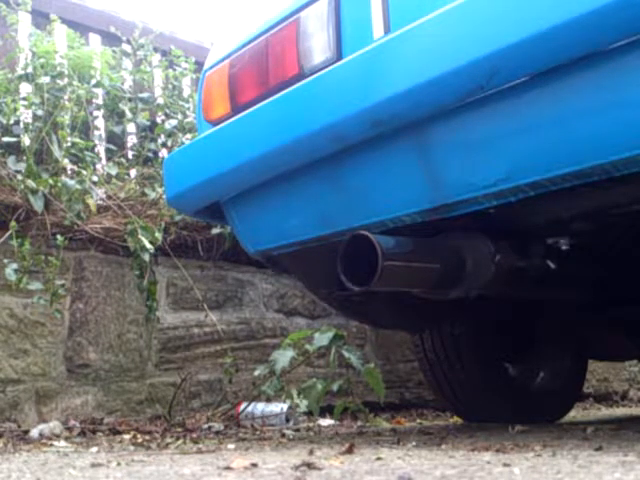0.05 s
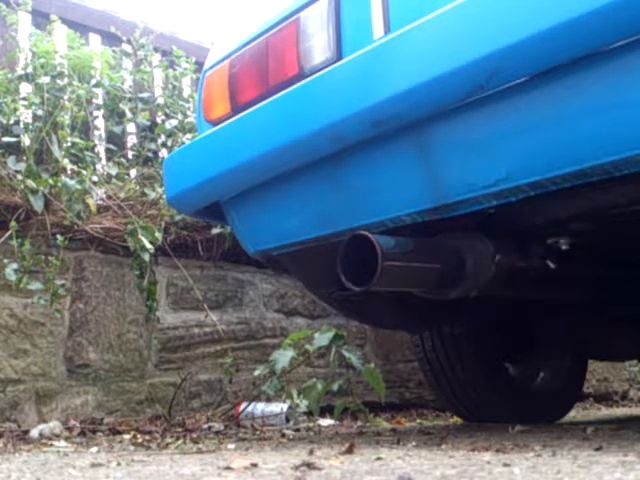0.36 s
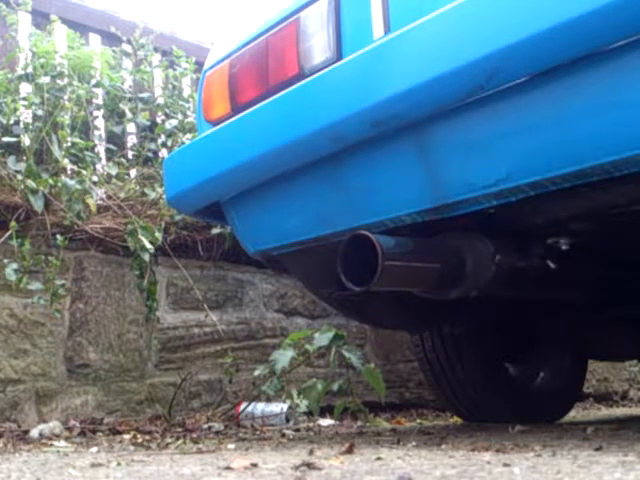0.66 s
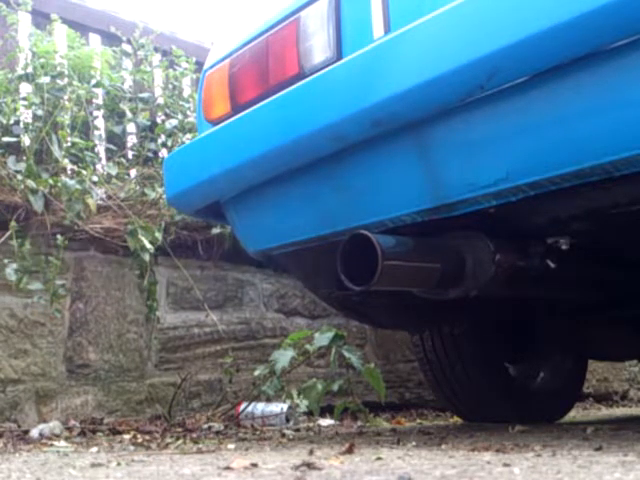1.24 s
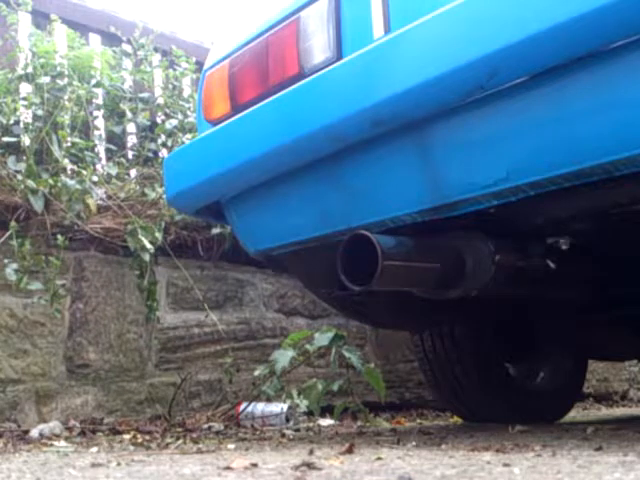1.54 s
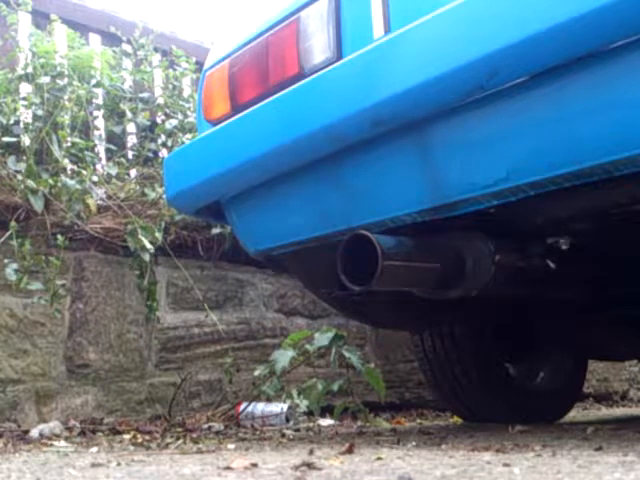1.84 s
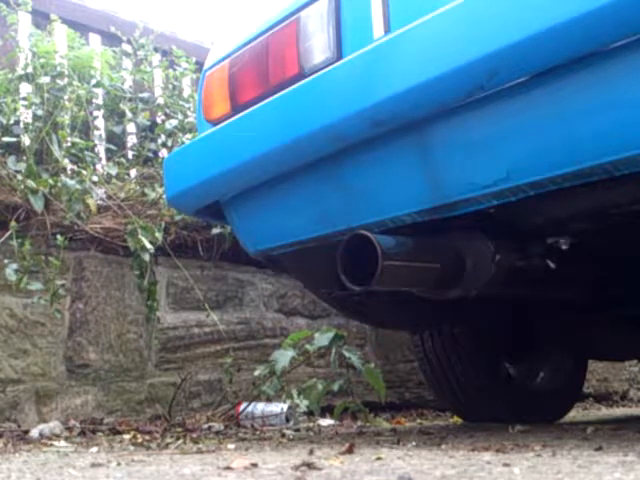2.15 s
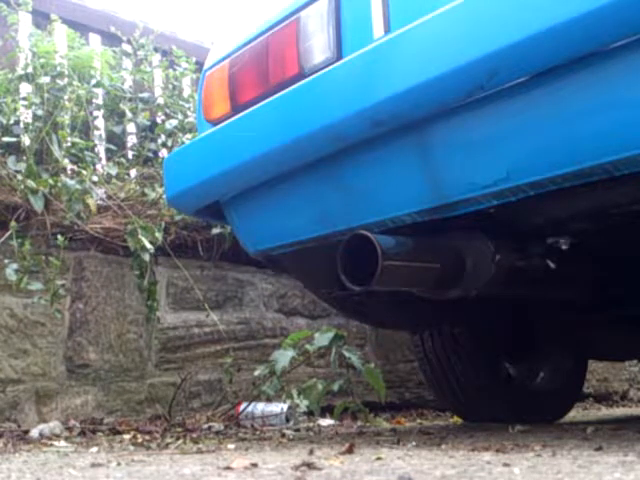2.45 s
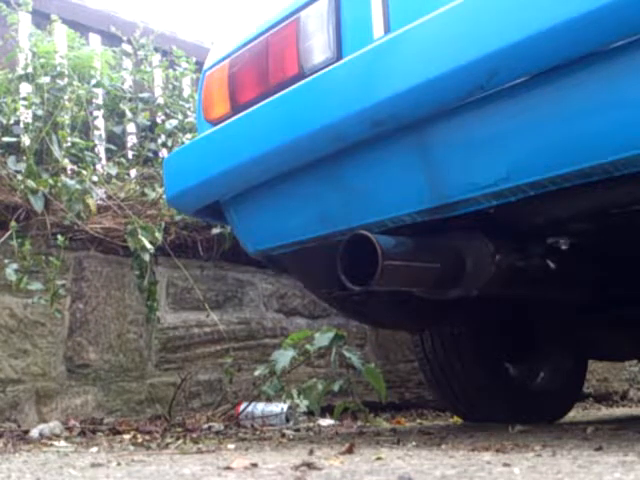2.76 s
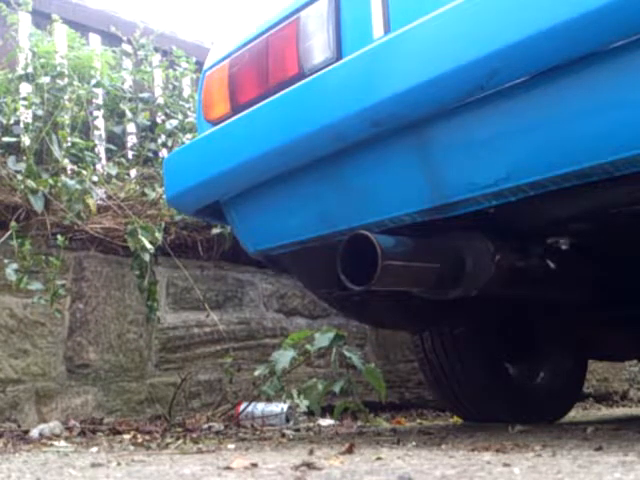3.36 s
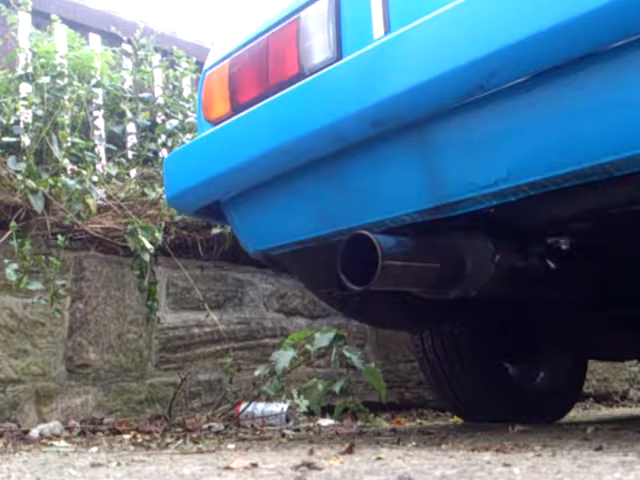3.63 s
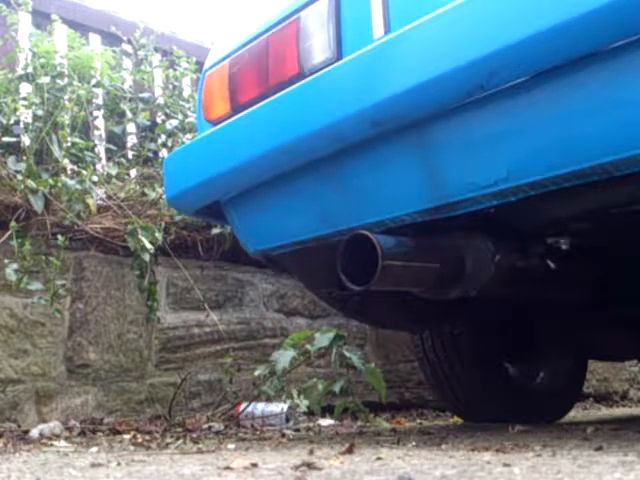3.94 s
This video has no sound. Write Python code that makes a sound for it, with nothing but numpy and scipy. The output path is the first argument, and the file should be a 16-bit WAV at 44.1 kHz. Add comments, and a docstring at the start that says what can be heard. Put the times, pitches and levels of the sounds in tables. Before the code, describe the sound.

A car starting up: the starter grinds, then the engine sputters to life and idles.

```python
"""A four-cylinder car engine starts from cold beside a stone wall, heard close to the tailpipe.
The starter clacks in and grinds through four compressions; the engine coughs, stumbles, catches and
settles into a fast, slightly uneven idle. Each firing sends a boom, a rasp and a crack down the pipe,
with belts and valves faint behind. The first firings drive a fast limiter."""
import sys
import numpy as np
from scipy import signal
from scipy.fft import rfft, irfft
from scipy.io import wavfile
from scipy.ndimage import uniform_filter1d, minimum_filter1d

SR = 44100
rng = np.random.default_rng(int(sys.argv[2]) if len(sys.argv) > 2 else 0)


def file_out(sig):
    """Save sig as 16-bit WAV at sys.argv[1]."""
    # one column per channel
    cols = np.atleast_2d(sig).T
    # limit, then scale
    lim = np.clip(cols, -1, 1)
    pcm = np.round(lim * 32767).astype(np.int16)
    wavfile.write(sys.argv[1], SR, pcm)


N = 176400
T = np.arange(N) / SR

# Engine speed once it catches. Each row: time in seconds, firings per second.
FIRING_RATE = [(1.186, 51), (1.25, 56), (1.34, 60), (1.45, 61.3), (1.6, 60), (1.8, 58.55), (2.2, 58.38),
               (2.68, 58.25), (3, 57.13), (3.4, 56.52), (3.75, 55.52), (4, 54.6)]
# The first, stumbling firings. Each row: start in seconds, then boom, rasp, crack and silencer ring in dB.
COLD_COUGHS = [(0.857, -1, 3, 12, -0.5), (0.878, -9, -7, -8, -4), (.898, 6, 13.5, 26.5, 2.5),
               (0.9277, 4.5, 8.5, 24, 2), (0.953, -15, 18.5, 11, -2.5), (0.9658, 10.5, 16.5, 24.5, -31),
               (0.974, -11, -2, 1, -17), (.995, -9, -1, -11, -4.5), (1.016, -21, 2, -9, -9),
               (1.0529, 13, 11, 29, 0), (1.1037, 8.5, 12, 20.5, -16), (1.124, 7, 6, 19, -14),
               (1.145, 0, 14.5, 18, 0), (1.1652, 14, 15, 9, 1.5)]
# Ringing engine and starter parts. Each row: pitch in Hz, level in dB, seconds to fade by 60 dB.
METAL_MODES = [(797, -12, .12), (1346, -6, .1), (1662, -10, .1), (1828, -10, .1), (2380, -1, .11),
               (2551, -9, .08), (3048, -7, .11), (3257, -8, .1), (3738, -8, .06)]
FIRST_COUGH_S, CATCH_S, SETTLED_S = COLD_COUGHS[0][0], FIRING_RATE[0][0], FIRING_RATE[4][0]


def firings():
    """The cylinders cough, then run. Each row: start in seconds, cylinder, boom, rasp and crack in dB."""
    # Force of the running engine. Each row: time in seconds, then boom, rasp and crack in dB.
    force = [(1.186, 1.5, 15, 20), (1.26, -1, 8.5, 13), (1.33, -4, 7.5, 10.5), (1.6, -2.5, 3, 1),
             (2.5, -1.5, 1, 2), (3.3, -1.5, 2, -3), (4, -1, 4, -32)]
    # The cylinders' uneven voices, in firing order. Each row: boom and rasp offsets in dB.
    cylinders = [(-2.5, -1), (.6, 0), (2, 1), (-.3, 0)]
    rows = [(s, k % 4, boom, rasp, crack) for k, (s, boom, rasp, crack, _) in enumerate(COLD_COUGHS)]
    cycles = np.cumsum(curve(FIRING_RATE) * (T >= CATCH_S)) / SR
    onsets = np.searchsorted(cycles, np.arange(int(cycles[-1]) + 1), "right")
    for k, s in enumerate(T[onsets.clip(0, N - 1)]):
        boom, rasp, crack = (curve(force, s, column) for column in (1, 2, 3))
        boom_offset, rasp_offset = cylinders[k % 4]
        rows.append((s, k % 4, boom + boom_offset, rasp + rasp_offset, crack))
    return rows


def exhaust():
    """Each firing leaves the pipe as a boom, a rasp of gas and a crack; coughs also ring the silencer."""
    # Deep body of one exhaust pulse. Each row: frequency in Hz, relative level in dB.
    boom_tone = [(20, -53), (38, -31), (56, -3), (85, -2), (117, 0.5), (150, 0.5), (178, -1), (232, -2.5),
                 (290, -6), (350, -32.5), (420, -30), (560, -36), (660, -23), (780, -31), (950, -52.5),
                 (2000, -64.5), (5000, -92)]
    # Gas rushing out behind the pulse. Each row: frequency in Hz, relative level in dB.
    rasp_tone = [(40, -38), (100, -3.5), (200, -7), (300, 4.5), (420, 3), (540, -2.5), (690, -0.5),
                 (800, -4), (950, -17.5), (1400, -25.5), (2500, -33), (6000, -63.5)]
    # Bright edge of a firing or spit. Each row: frequency in Hz, relative level in dB.
    crack_tone = [(200, -11), (700, -4), (1300, 2), (2200, -10), (4000, -23), (9000, -22), (15000, -35)]
    # The silencer's hollow ring. Each row: pitch in Hz, level in dB, seconds to fade by 60 dB.
    silencer_modes = [(82.1, 1.5, 0.22), (126.6, -10, 0.21), (178, -20, 0.1), (231.3, -15, 0.6),
                      (701, -34, 0.53)]
    # Pops of late-burning fuel in the pipe. Each row: start in seconds, level in dB.
    spits = [(0.955, 28), (1.167, 41), (1.174, 34), (1.187, 19), (1.207, 24), (1.226, 26.5), (1.266, 20),
             (1.451, 16.5), (1.97, 11.5), (2.108, 11), (2.136, 5), (2.174, 11.5), (2.52, 11.5), (3.78, 7.5),
             (3.925, 9)]
    rasp_rise_s, rasp_fall_s, crack_fall_s, spit_fall_s = 0.0059, 0.013, 0.0053, 0.0019
    jitter_s, crack_lag_s, boom_scatter_db, crack_scatter_db = 0.00006, 0.003, 1.5, 2
    repeat_share = 0.52  # part of the rasp's power that is the same each time a cylinder fires
    booms, rasps, cracks, knocks = np.zeros((4, N))
    t = T[:2048]
    rush = (1 - np.exp(-t / rasp_rise_s)) * np.exp(-t / rasp_fall_s)
    signatures = noise((4, len(t)))
    for s, cylinder, boom_db, rasp_db, crack_db in firings():
        late, force, sharp = noise(3)
        s = s + jitter_s * late
        add(booms, s, amp([boom_db + boom_scatter_db * force]))
        gas = np.sqrt(repeat_share) * signatures[cylinder] + np.sqrt(1 - repeat_share) * noise(len(t))
        add(rasps, s, amp(rasp_db) * rush * gas)
        crack_db += crack_scatter_db * sharp * (s > CATCH_S)
        add(cracks, s + crack_lag_s, amp(crack_db) * np.exp(-t / crack_fall_s) * noise(len(t)))
    for s, *_, ring_db in COLD_COUGHS:
        add(knocks, s, amp([ring_db - 1.5]))
    for s, db in spits:
        add(cracks, s, amp(db) * np.exp(-t / spit_fall_s) * noise(len(t)))
    pipe = response(boom_tone)
    add(pipe, 0.0053, amp(-1) * pipe)  # the pulse runs up the pipe and back once more
    boom = -amp(-1) * through(booms, pipe / abs(pipe).max())
    silencer = through(knocks, ring(silencer_modes))
    rasp = amp(-19.5) * through(rasps, response(rasp_tone))
    crack = amp(-40) * through(cracks, response(crack_tone))
    return boom + silencer + rasp + crack


def pipe_song():
    """As the engine settles, the pipe sings on a few overtones of the firing rate."""
    # Clear tones of the idle. Each row: multiple of the firing rate, level in dB.
    overtones = [(6, -32), (10, -37), (11, -29.5), (12, -33), (13, -37), (14, -43)]
    cycles = np.cumsum(curve(FIRING_RATE)) / SR
    fade_in = np.clip((T - CATCH_S) / (SETTLED_S - CATCH_S), 0, 1)
    return fade_in * sum(amp(db) * np.sin(2 * np.pi * (k * cycles + rng.random())) for k, db in overtones)


def starter():
    """The motor sizzles and whines; each compression drags its pitch down and makes the teeth grind."""
    # Compressions that load the starter. Each row: start in seconds, length in seconds, level in dB.
    strokes = [(0.106, 0.21, -7), (0.379, 0.11, -1.5), (0.58, 0.0564, 1), (0.74, 0.08, 0.5),
               (1.031, .025, -3)]
    # The motor spinning, then running down. Each row: time in seconds, level in dB.
    spin_levels = [(0, -44), (.03, -11), (.06, 0), (.11, -8), (.27, -2), (.31, 0), (.38, 2.5), (.46, -4),
                   (.55, 2), (.66, 0.5), (.74, 5), (.79, -5), (.85, 6.5), (.98, -1.5), (1.05, 3.5),
                   (1.13, 2), (1.2, -9.5), (1.35, -10.5), (1.6, -13), (2.1, -38.5), (4, -94)]
    # Gear teeth under load. Each row: frequency in Hz, relative level in dB.
    grind_tone = [(60, -6), (200, 3.5), (330, -4.5), (600, 2), (900, 1), (1400, -0.5), (2000, -5.5),
                  (3000, -8.5), (5000, -23), (10000, -35), (13000, -39)]
    # Sizzle of the spinning motor. Each row: frequency in Hz, relative level in dB.
    sizzle_tone = [(59, -43.5), (100, 9), (300, -17.5), (381, -1), (465, -21.5), (640, 2.5), (797, -11),
                   (1340, -7.5), (1540, -15.5), (2040, -3), (2210, -11.5), (3160, -4), (3490, -11.5),
                   (3780, -5.5), (5860, -13), (9100, -10.5), (11800, -18), (15300, -59), (22000, -120)]
    # The gear's whine. Each row: multiple of the tooth rate, level in dB.
    whine_partials = [(1, 0.5), (2, -14), (4, -9), (9, 0), (10, -14), (11, -16.5)]
    rise_s, fall_s, sag_db = 0.0073, 0.015, -6
    unloaded_tooth_hz, drag, waver_depth, waver_s = 363, 0.0591, 0.0081, 0.0038
    load = np.zeros(N)
    for s, length, db in strokes:
        age = np.maximum(T - s, 0)
        attack = 1 - np.exp(-age / rise_s)
        release = np.exp(-np.maximum(age - length, 0) / fall_s)
        load += amp(db + sag_db * np.minimum(age / length, 1)) * attack * release
    waver = waver_depth * unit(uniform_filter1d(noise(), int(waver_s * SR)))
    tooth_phase = 2 * np.pi * np.cumsum(unloaded_tooth_hz * (1 - drag * load + waver)) / SR
    teeth = 1 + 0.43 * np.cos(tooth_phase)  # the noise pulses as each tooth meshes
    spin = amp(curve(spin_levels))
    whine = spin * sum(amp(db) * np.cos(k * tooth_phase) for k, db in whine_partials)
    scrape = noise() * teeth * load
    metal = ring(METAL_MODES)
    gear_ring = through(scrape, metal / np.linalg.norm(metal))
    grind = through(scrape, response(grind_tone)) + amp(-10.5) * gear_ring
    sizzle = through(noise() * teeth * spin * (1 + 0.52 * load), response(sizzle_tone))
    return amp(-24) * grind + amp(-34) * sizzle + amp(-47) * whine


def pinion():
    """The starter gear rattles into mesh and rings the metal round it."""
    # The pinion slamming in. Each row: start in seconds, level in dB.
    clacks = [(.039, -10), (.0455, 1), (.052, -3), (.059, -5)]
    # Colour of a clack. Each row: frequency in Hz, relative level in dB.
    clack_tone = [(30, -44), (100, 2), (190, 8.5), (350, -11), (800, 2.5), (1300, -7), (2400, 0.5),
                  (4500, -8), (5600, -15), (9000, -12.5), (11000, -16.5), (12500, -33), (15000, -40)]
    # Ring of solenoid and pinion. Each row: pitch in Hz, level in dB, seconds to fade by 60 dB.
    solenoid_modes = [(199, -14, .12), (1997, -13, .1), (2379, -2, .1), (3779, -13, .12), (4813, -17, .12),
                      (6320, -22, .12), (8931, -19, .11)]
    bursts, knocks = np.zeros((2, N))
    t, fall_s = T[:SR // 4], 0.013
    for s, db in clacks:
        add(bursts, s, amp(db) * np.exp(-t / fall_s) * noise(len(t)))
        add(knocks, s, amp([db]))
    rattle = through(bursts, response(clack_tone))
    return amp(-16.5) * rattle + amp(-18) * through(knocks, ring(solenoid_modes))


def air_puffs():
    """Unburnt air puffs softly from the pipe while cranking; later, slow thumps of air hit the mic."""
    # Puffs from the pipe. Each row: start in seconds, level in dB.
    puffs = [(0.119, -5), (0.235, 2.5), (.44, 3), (0.494, -8), (.615, -2), (0.785, 6)]
    # Sub-bass thumps of air. Each row: start in seconds, level in dB.
    thumps = [(1.485, -13), (3.04, -25)]
    puff_hz, puff_t60_s, puff_rise_s = 75.5, 0.19, 0.02
    thump_hz, thump_t60_s = 32, 0.08
    air = np.zeros(N)
    puff = ring([(puff_hz, -16.5, puff_t60_s)])
    puff *= np.minimum(T[:len(puff)] / puff_rise_s, 1)
    for s, db in puffs:
        add(air, s, amp(db) * puff)
    for s, db in thumps:
        add(air, s, ring([(thump_hz, db, thump_t60_s)]))
    return air


def engine_bay():
    """Belts whirr and valves tick in step with the firing rate, fading in over the coughs."""
    # Belts and valve gear under the bonnet. Each row: frequency in Hz, relative level in dB.
    whirr_tone = [(530, -21.5), (900, -13), (1120, -16), (1330, -10), (1700, -17.5), (2000, -0.5),
                  (2130, -10), (2450, -5), (3420, -16), (3810, -10), (4720, -18.5), (5430, -18),
                  (7500, -23.5), (8630, -21), (9710, -19.5), (10800, -22), (11800, -33.5), (15300, -61),
                  (22000, -120)]
    fade_in = np.clip((T - FIRST_COUGH_S) / (CATCH_S - FIRST_COUGH_S), 0, 1)
    cycles = np.cumsum(curve(FIRING_RATE)) / SR
    pulsing = 1 + 0.083 * np.cos(2 * np.pi * cycles)
    whirr = unit(through(noise() * pulsing, response(whirr_tone)))
    ticks = np.exp(-(2 * cycles % 1) / 0.3)  # two per firing
    valves = unit(through(noise() * ticks, ring(METAL_MODES)))
    return fade_in * (amp(-44.5) * whirr + amp(-55) * valves)


def yard(x):
    """Adds a slap from the stone wall and a short scattered tail."""
    slap_s, tail_t60_s = 0.0105, 0.41
    t = T[:SR // 2]
    tail = noise(len(t)) * amp(-60 * t / tail_t60_s) * (t > slap_s)
    echo = amp(-11) * tail / np.linalg.norm(tail)
    add(echo, slap_s, amp([-11.5]))
    return x + through(x, echo)


def amp(db):
    """Decibels to gain."""
    return 10 ** (np.asarray(db) / 20)


def unit(x):
    """Scales to rms 1."""
    return x / np.sqrt(np.mean(x ** 2) + 1e-20)


def noise(size=N):
    """White noise."""
    return rng.standard_normal(size)


def curve(rows, t=T, column=1):
    """Glides along one column of a timed table."""
    rows = np.array(rows)
    return np.interp(t, rows[:, 0], rows[:, column])


def add(mix, s, sound):
    """Mixes a sound in at s seconds."""
    part = mix[max(round(s * SR), 0):][:len(sound)]
    part += sound[:len(part)]


def through(x, impulse):
    """Plays a signal through an impulse response."""
    return signal.fftconvolve(x, impulse)[:N]


def response(tone, size=16384):
    """Minimum-phase impulse response of energy 1, shaped by rows of frequency in Hz and level in dB."""
    points_hz, db = np.transpose(tone)
    hz = np.fft.rfftfreq(size, 1 / SR)
    spectrum_db = np.interp(np.log(hz + 1), np.log(points_hz + 1), db)
    cepstrum = irfft(spectrum_db * np.log(10) / 20)
    cepstrum[1:size // 2] *= 2  # folding the cepstrum packs the energy into the attack
    cepstrum[size // 2 + 1:] = 0
    impulse = irfft(np.exp(rfft(cepstrum)))[:size // 2]
    return impulse / np.linalg.norm(impulse)


def ring(modes):
    """Decaying modes of a struck object."""
    t = T[:SR // 2]
    return sum(amp(db - 60 * t / t60) * np.sin(2 * np.pi * hz * t) for hz, db, t60 in modes)


def scene():
    """The tailpipe is near and dry; the starter and engine bay carry the yard's echo. Mono."""
    near = exhaust() + pipe_song() + air_puffs()
    under_bonnet = pinion() + starter() + engine_bay()
    return (near + yard(under_bonnet))[None]


def record(dry):
    """A fast limiter holds the peaks to full scale; a steep low-pass trims the very top."""
    limiter_s, cutoff_hz = 0.005, 15500
    span = int(limiter_s * SR)
    allowed_gain = np.minimum(1, 1 / (abs(dry) + 1e-9))
    limited = dry * uniform_filter1d(minimum_filter1d(allowed_gain, span), span)
    low_pass = signal.firwin(511, cutoff_hz, window=("kaiser", 9), fs=SR)
    return signal.oaconvolve(limited, low_pass[None], "same")


dry = scene()
out = record(dry)
file_out(out)
```